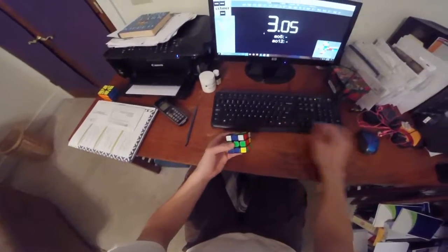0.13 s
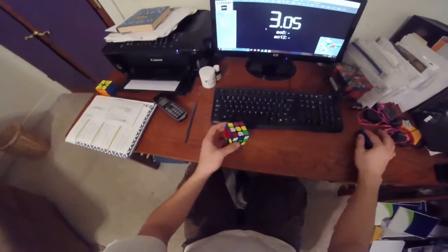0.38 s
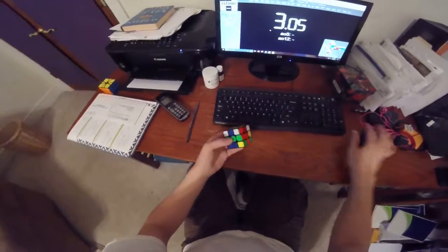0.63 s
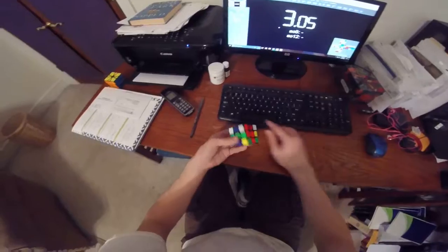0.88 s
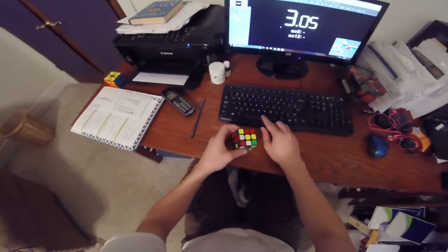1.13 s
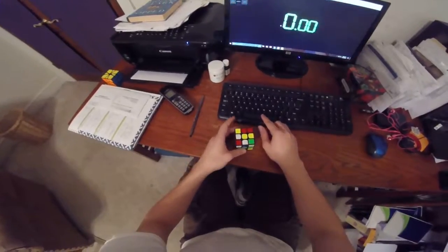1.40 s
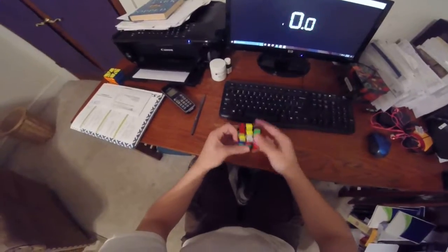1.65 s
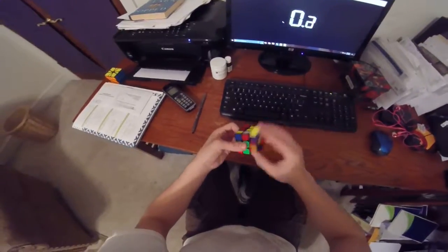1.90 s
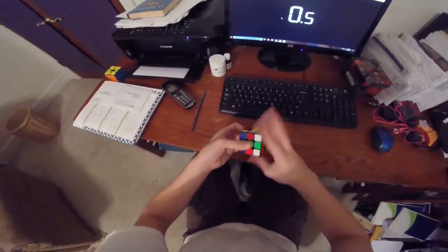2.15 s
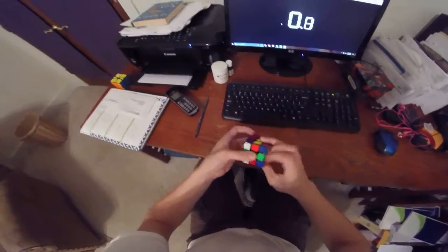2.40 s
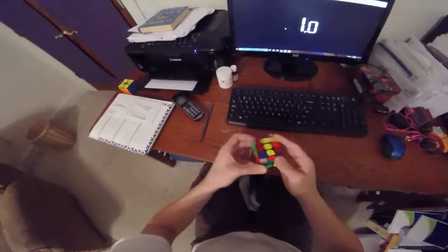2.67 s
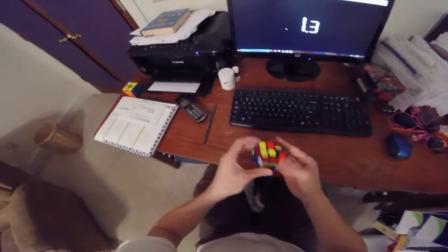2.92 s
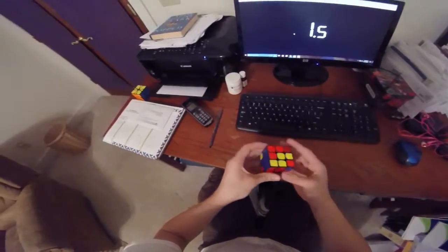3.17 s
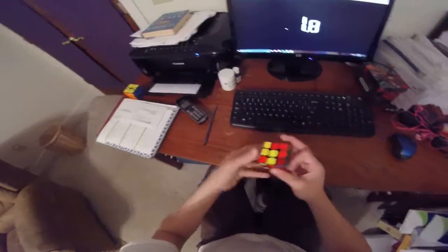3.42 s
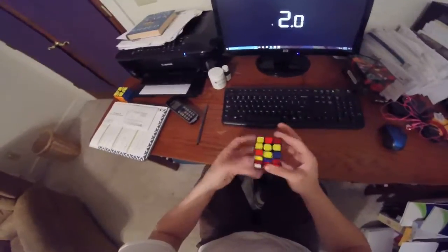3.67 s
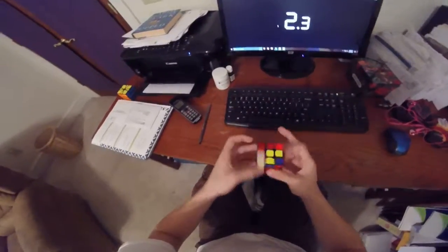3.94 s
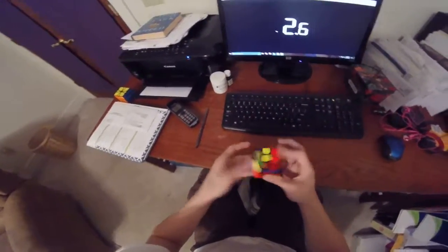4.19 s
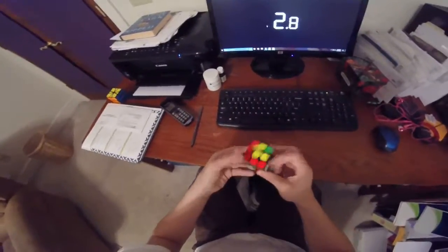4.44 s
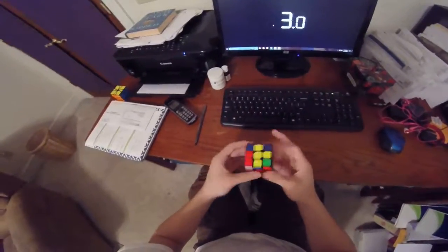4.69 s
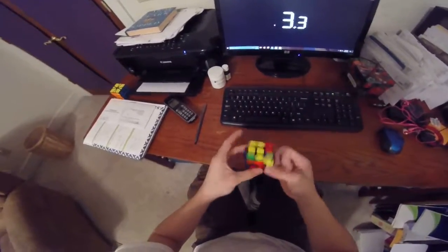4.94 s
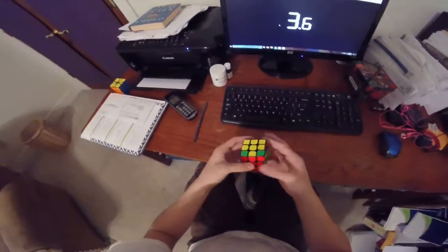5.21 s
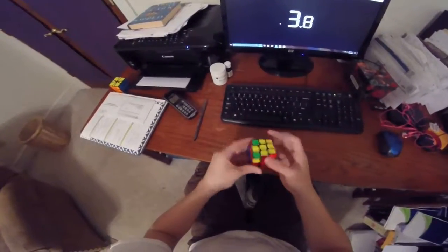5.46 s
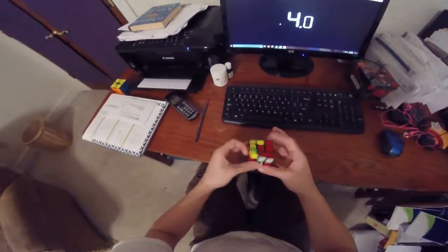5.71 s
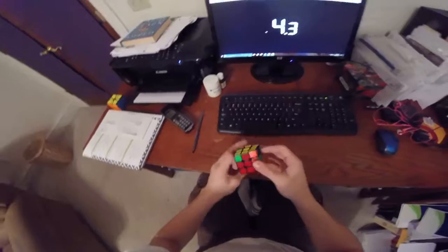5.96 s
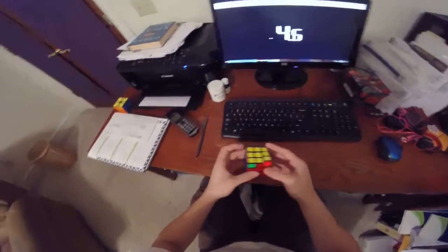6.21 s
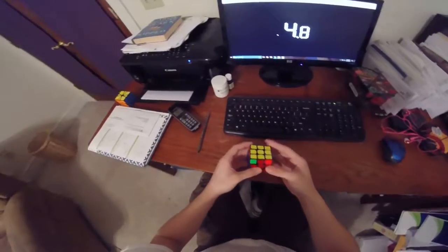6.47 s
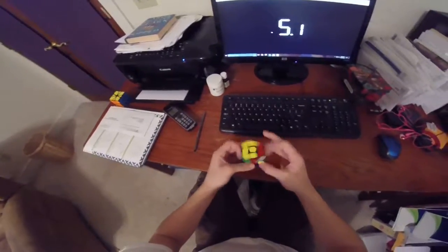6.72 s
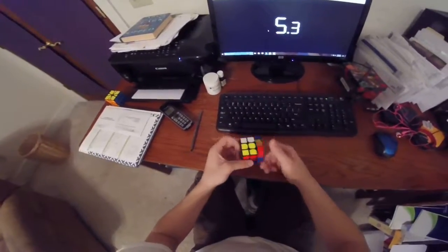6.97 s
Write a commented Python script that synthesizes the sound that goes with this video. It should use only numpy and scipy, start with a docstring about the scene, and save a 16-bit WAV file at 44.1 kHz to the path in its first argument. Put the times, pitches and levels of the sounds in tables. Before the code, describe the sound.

A person's hands work at a wooden desk: a tiny mouse tick, a firm key press with a small bounce and release, then rapid plastic cube turning. Dry, bright clicks and hollow clacks ride on rough sliding chatter, growing stronger midway, with short gaps while the hands regrip and a final quick burst. Close small microphone, short room reflections, low steady hiss.

```python
"""A quiet hiss, strongest in the bass, lies under everything in a small furnished room.
First a mouse button ticks, as short pushes ring its switch and its plastic body.
Then a wide keyboard key clacks and knocks on a wooden desk, as pushes ring the cap and the desk top.
Last a plastic puzzle cube is turned fast in two hands: layers slide as a stream of small rough contacts,
and pieces catch and snap as single noisy pushes that ring cavity, shell and thin edges."""
import sys
import numpy as np
from scipy import signal
from scipy.fft import rfft, irfft, next_fast_len
from scipy.io import wavfile

SR = 44100
rng = np.random.default_rng(int(sys.argv[2]) if len(sys.argv) > 2 else 0)


def put_to_file(sound):
    """Save the sound as 16-bit audio at rate SR, in the file named by the first command-line argument."""
    columns = np.atleast_2d(sound).T  # one column per channel
    safe = np.clip(columns, -1, 1)
    whole_steps = np.round(safe * 32767)
    wavfile.write(sys.argv[1], SR, whole_steps.astype(np.int16))


def convert_level_to_amplitude(level_db):
    """Map a level in decibels to its linear amplitude factor."""
    exponent = np.asarray(level_db, float) / 20
    return 10 ** exponent


N = 313110  # length in samples


def unit_rms(x):
    """Scales a sound to rms 1."""
    return x / np.sqrt(np.mean(x ** 2) + 1e-20)


def along(points, hz):
    """Reads a curve of (Hz, value) points on a log frequency axis."""
    point_hz, value = np.transpose(points)
    return np.interp(np.log(hz + 1), np.log(point_hz + 1), value)


def filtered(x, response):
    """Filters x by a complex response, given as a function of frequency in Hz."""
    size = next_fast_len(N + 8192)
    spectrum = rfft(x, size) * response(np.fft.rfftfreq(size, 1 / SR))
    return irfft(spectrum, size)[..., :N]


def resonances(modes, hz):
    """Causal response of a set of resonant modes, scaled so that white noise keeps its level."""
    response = 0
    for k, (center, width, db) in enumerate(modes):
        band = 1j * hz * width / (center * center - hz * hz + 1j * hz * width)
        response = response + (-1) ** k * convert_level_to_amplitude(db) * band  # alternating signs
    return response / np.sqrt(np.mean(np.abs(response) ** 2))


def rung(force, modes):
    """Drives the modes with a running force."""
    return filtered(force, lambda hz: resonances(modes, hz))


def placed(start_s, energy_db, push, modes, pitch=1):
    """Rings the modes with each row of push, at its pitch ratio and energy, and lands it at its time."""
    size = push.shape[1]
    hz = np.fft.rfftfreq(size, 1 / SR)
    ring = irfft(rfft(push) * resonances(modes, hz / pitch), size)
    ring = ring * convert_level_to_amplitude(energy_db)[:, None] / np.linalg.norm(ring, axis=1, keepdims=True)
    at = np.round(start_s * SR).astype(int)[:, None] + np.arange(size)
    return np.bincount(at.ravel(), ring.ravel(), N + SR)[:N]


def contacts(start_s, db, hold_ms, modes, rise_ms, fall_ms):
    """Short rough pushes: a quick rise, a hold while the faces chatter, a quick release.

    Row 0 is heard directly; row 1 is the same energy sent all round,
    where the chance colour of one push evens out."""
    pitch_spread = 0.024  # scatter of the log pitch from contact to contact
    rise_share = 0.21  # part of the contact time added to the rise
    t_ms = np.arange(2048) * 1000 / SR
    hold_ms = hold_ms[:, None]
    rise = np.clip(t_ms / (rise_ms + rise_share * hold_ms), 0, 1)
    release = np.exp(-np.clip(t_ms - hold_ms, 0, None) / fall_ms)
    shape = rise * release
    energy_db = db + 10 * np.log10(np.sum(shape ** 2, axis=1))
    pitch = np.exp(pitch_spread * rng.standard_normal((len(start_s), 1)))
    rough_push = shape * rng.standard_normal(shape.shape)
    click = np.broadcast_to(t_ms == 0, shape.shape)
    direct = placed(start_s, energy_db, rough_push, modes, pitch)
    spread = placed(start_s, energy_db, click, modes, pitch)
    return np.array([direct, spread])


# Tilt of the background hiss. Each row: frequency in Hz, relative density in dB per Hz.
HISS_SPECTRUM = [(15, -6.5), (25, 0.5), (120, -4.5), (300, -9), (700, -16), (2000, -23), (5000, -30.5),
                 (10000, -40.5), (15500, -43)]


def hiss():
    """Steady air and microphone noise, strongest in the bass."""
    noise = filtered(rng.standard_normal(N), lambda hz: convert_level_to_amplitude(along(HISS_SPECTRUM, hz)))
    return convert_level_to_amplitude(-53.5) * unit_rms(noise)


# Decay of the furnished room. Each row: frequency in Hz, nominal t60 in s, between the quick and slow falls.
ROOM_DECAY = [(150, 0.23), (500, 0.33), (1500, 0.16), (4000, 0.18), (10000, 0.17)]


def room(x):
    """Diffuse answer of the room, a quick fall with a weaker slow one under it.

    The hands move, so the noise tail is new every 0.2 s, with crossfades."""
    hop = SR // 5
    out = np.zeros(N + 3 * SR)
    padded = np.pad(x, (hop, 2 * hop))
    fade = np.sqrt(np.hanning(2 * hop + 1)[:-1])
    for start in range(0, N + hop, hop):
        hz, t, noise = signal.stft(rng.standard_normal(SR // 2), SR, nperseg=256)
        fall_db = -60 * t / along(ROOM_DECAY, hz)[:, None]
        quick_and_slow = convert_level_to_amplitude(1.32 * fall_db) + convert_level_to_amplitude(0.48 * fall_db - 12.5)
        tail = signal.istft(noise * quick_and_slow, SR, nperseg=256)[1]
        tail = tail / np.linalg.norm(tail)
        wet = signal.fftconvolve(padded[start:start + 2 * hop] * fade, tail)
        out[start:start + len(wet)] += wet
    return np.pad(out[hop:], (round(0.004 * SR), 0))[:N]  # the answer starts 4 ms late


# Mouse button down and up. Each row: start in seconds, tick in dB, body in dB, contact time in ms.
MOUSE_CLICKS = [(.538, -58, -47, 3.3), (.5425, -54.5, -51, 2.8), (.6253, -66, -50.5, 4.7),
                (.629, -60, -58, 10)]
# Ring of the small switch. Each row: frequency in Hz, width in Hz, relative level in dB.
SWITCH_MODES = [(5540, 500, -10), (6600, 320, -4), (8200, 690, -10.5)]
# Ring of the mouse's plastic body. Each row: frequency in Hz, width in Hz, relative level in dB.
MOUSE_BODY_MODES = [(685, 210, 0.18), (1880, 590, -1.7)]


def mouse():
    """A small switch ticks inside its plastic body, both rung by the same short contacts."""
    start_s, tick_db, body_db, hold_ms = np.transpose(MOUSE_CLICKS)
    tick = contacts(start_s, tick_db, hold_ms, SWITCH_MODES, rise_ms=0.25, fall_ms=3.1)
    body = contacts(start_s, body_db, hold_ms, MOUSE_BODY_MODES, rise_ms=0.4, fall_ms=1.3)
    return tick + body


# The wide key pressed, bouncing and let go.
# Each row: start in seconds, clack in dB, desk knock in dB, contact time in ms.
KEY_HITS = [(1.1348, -29, -28, 1), (1.208, -46, -45, 0.83), (1.23, -57, -40.5, 5.5),
            (1.2384, -54, -46, 1.2), (1.3385, -34.5, -35, 1.47), (1.352, -39, -39, 0.9),
            (1.6001, -40, -42.5, .7)]
# Ring of the key's cap. Each row: frequency in Hz, width in Hz, relative level in dB.
KEYCAP_MODES = [(1070, 510, 1), (1990, 190, 11), (2630, 370, 2), (3450, 480, 5.5), (5360, 1700, -2.5),
                (7560, 2400, -6.5), (10900, 2700, -32)]
# Ring of the wooden desk top. Each row: frequency in Hz, width in Hz, relative level in dB.
DESK_MODES = [(134, 22, -4.5), (200, 28, -12), (277, 44, -1.5), (337, 51, -2), (468, 38, -1),
              (632, 39, 3.5), (734, 135, -5)]


def key():
    """The key lands, bounces and springs back: the cap clacks and a smooth push knocks the desk top.

    Long pushes ring low."""
    start_s, clack_db, knock_db, contact_ms = np.transpose(KEY_HITS)
    clack = contacts(start_s, clack_db, contact_ms, KEYCAP_MODES, rise_ms=0.11, fall_ms=2.3)
    t_ms = np.arange(8192) * 1000 / SR
    push = np.sin(np.pi * np.clip(t_ms / contact_ms[:, None], 0, 1))
    energy_db = knock_db + 10 * np.log10(SR / 100)  # level as if spread over 10 ms
    knock = placed(start_s, energy_db, push, DESK_MODES)
    return clack + knock * convert_level_to_amplitude([[0], [-5]])  # the room gets less of the knock


# Layers rubbing as they turn. Each row: start in seconds, effort in dB, build time in ms.
RUB_TURNS = [(1.592, -43.5, 12), (1.632, -46.5, 13), (1.674, -46.5, 41), (1.769, -41, 13),
             (1.828, -44.5, 28), (1.962, -40.5, 26), (2.004, -39, 9.5), (2.077, -43, 44), (2.25, -43, 33),
             (2.29, -41.5, 14), (2.307, -34, 65), (2.469, -51, 15), (2.52, -45.5, 18), (2.559, -35.5, 4.8),
             (2.985, -45.5, 29), (3.023, -32, 16), (3.07, -38, 17), (3.095, -35, 15), (3.41, -39.5, 53),
             (3.535, -45.5, 14), (3.574, -29.5, 36), (3.645, -36.5, 28), (3.785, -44.5, 9.6),
             (3.815, -34.5, 17.4), (3.847, -30.5, 67), (3.973, -29, 17.6), (4.066, -42, 12),
             (4.094, -34, 30), (4.21, -45, 12), (4.241, -31, 16), (4.325, -52, 27), (4.437, -48.5, 13),
             (4.467, -31.5, 18), (4.538, -38.5, 26), (4.635, -37, 43), (4.863, -46, 11), (4.878, -38, 5.4),
             (4.944, -29, 16), (4.982, -30, 38), (5.388, -52, 14), (5.422, -49, 15), (5.539, -39, 17),
             (5.625, -33, 43), (5.698, -29, 44), (5.771, -27.5, 47.5), (5.838, -30, 25), (5.89, -37, 8.5),
             (5.926, -30, 21), (6.566, -49, 13), (6.585, -36, 17.7), (6.673, -34, 16), (6.712, -36, 34),
             (6.765, -35.5, 29), (6.825, -37, 36), (6.888, -40, 34), (6.954, -37, 13), (7.0, -38.5, 13),
             (7.03, -43, 17), (7.07, -52, 9)]
# How closed the palms are. Each row: time in seconds, change of the palm hollow's level in dB.
CUPPED_PALMS = [(1.6, 2), (2.1, -0.5), (2.4, -2.5), (3.0, 1.5), (3.6, -2), (4.0, -0.5), (4.5, 1), (5.0, 4),
                (5.5, 0), (5.9, 1), (6.7, -1), (6.96, 7), (7.05, 0)]
# Hollow of the cupped palms. Each row: frequency in Hz, width in Hz, relative level in dB.
PALM_MODES = [(606, 173, 4.5), (730, 346, -3.5)]
# Ring of the cube's shell. Each row: frequency in Hz, width in Hz, relative level in dB.
SHELL_MODES = [(1060, 266, -6), (1437, 188, 2), (2030, 490, -0.5)]
# Ring of the cube's inner cavity. Each row: frequency in Hz, width in Hz, relative level in dB.
CAVITY_MODES = [(3255, 506, 12.97), (3520, 281, 18.4), (4480, 750, 2)]
# Ring of the cube's thin edges. Each row: frequency in Hz, width in Hz, relative level in dB.
EDGE_MODES = [(5190, 410, -4), (6650, 610, -2), (8110, 490, -4), (10100, 1840, -12.5), (11100, 1600, -16.5)]


def rubbing_effort():
    """Every turn climbs, holds and lets go alike; the palm hollow swings less than the effort."""
    climb_db, hold_ms, ease_db_per_ms = 13, 17.3, 1.9
    firm_turn_db, firm_palm_db, palm_follows = -33, -52, 0.44
    since_ms = np.arange(SR // 4) * 1000 / SR
    power = np.zeros((2, N + SR))
    for start_s, db, build_ms in RUB_TURNS:
        cupped_db = np.interp(start_s, *np.transpose(CUPPED_PALMS))
        palm_db = firm_palm_db + palm_follows * (db - firm_turn_db) + cupped_db
        building_db = climb_db * np.minimum(since_ms / build_ms - 1, 0)
        easing_db = ease_db_per_ms * np.maximum(since_ms - build_ms - hold_ms, 0)
        course_db = building_db - easing_db
        at = round(start_s * SR)
        power[:, at:at + len(since_ms)] += convert_level_to_amplitude(2 * (np.array([[db], [palm_db]]) + course_db))
    return np.sqrt(power[:, :N])


def slide():
    """Layers rub and loose pieces rattle: many small uneven contacts ring the cube and the palm hollow."""
    effort, grip = rubbing_effort()
    tick_db = np.minimum(7.0 * rng.exponential(size=N), 8)  # capped, as the big ones are the snaps
    ticks = (rng.random(N) < 400 / SR) * convert_level_to_amplitude(tick_db)  # about 400 per second
    tick_fall = np.exp(-np.arange(300) / (0.00085 * SR))  # 0.85 ms decay
    chatter = 0.39 + unit_rms(signal.fftconvolve(ticks, tick_fall)[:N])

    def rough():
        return unit_rms(chatter * rng.standard_normal(N))

    cavity = convert_level_to_amplitude(-6.0) * rung(effort * rough(), CAVITY_MODES)
    edges = convert_level_to_amplitude(-12.5) * rung(effort * rough(), EDGE_MODES)
    shell = convert_level_to_amplitude(-7.5) * rung(effort * rough(), SHELL_MODES)
    palms = rung(grip * rough(), PALM_MODES)
    return cavity + edges + shell + palms


# Cube snaps. Each row: start in seconds, cavity in dB, shell in dB relative to cavity, contact time in ms.
CUBE_SNAPS = [(1.676, -37, 0, 1.7), (1.6934, -35, -2.5, 1.6), (1.7231, -42, 2, 4), (1.746, -34, -3.5, 5.3),
              (1.7913, -29, -9.5, 1.6), (1.8554, -45, 3.5, 8.3), (1.8756, -40, 3, 3.3),
              (1.966, -43.5, -5, 6.4), (1.9878, -33, -5, 3.4), (2.0229, -31.5, -3, 4.5),
              (2.112, -36, 2, 3.2), (2.132, -34, -3.5, 1), (2.2815, -33, -4.5, 5), (2.3288, -31, -6, 2.9),
              (2.3508, -29.5, -8, 1.1), (2.3768, -25.5, -0.2, 4.3), (2.4002, -28.5, -17, 3),
              (2.488, -38.5, -3.5, 2.7), (2.5662, -30, -4.5, 8.2), (2.5852, -30.5, -10, 1.5),
              (2.6253, -40.5, -7, 2), (2.7177, -41.5, -16, 2.9), (2.8212, -51, 3.5, 1.7),
              (2.891, -58, 2, 2.3), (3.021, -28.5, -6.5, 3.1), (3.0389, -28.5, -2.5, 1.3),
              (3.0495, -25.5, -5.5, 5.6), (3.0586, -30, 3, 0.99), (3.085, -26, -8, 2.2),
              (3.1212, -32, 2.5, 1.7), (3.1342, -36, -20, 3.1), (3.1956, -45, -9, 1.6),
              (3.4452, -35.5, 1.5, 2.2), (3.4559, -33, -17, 1.7), (3.5649, -41.5, 1, 3.7),
              (3.5815, -30.5, 2.5, 2), (3.6172, -20, -6, 2.8), (3.6722, -26.5, 1.5, 1.37),
              (3.685, -29.5, -6, 4.2), (3.843, -27.5, -6.5, 2.2), (3.861, -34, -5, 3.5),
              (3.879, -26.5, -9, 2.7), (3.899, -19, -1.5, 0.91), (3.9221, -23, -2.5, 2.3),
              (3.9598, -31, -6, 3.2), (3.9987, -33.5, -2.5, 5.4), (4.0766, -28.5, -5, 0.83),
              (4.0943, -35.5, 3, 3.2), (4.1037, -32, -2.5, 8), (4.121, -26, -9, 3), (4.1352, -23, -7, 5.4),
              (4.1792, -35.5, -3, 3.6), (4.2404, -28.5, -10, 2), (4.2624, -31.5, -4.5, 15),
              (4.2809, -26.5, -6, 5), (4.3393, -34.5, -30, 1.3), (4.3592, -36.5, -12, .91),
              (4.4641, -34.5, -4, 3.7), (4.481, -20, -11.5, 2), (4.5105, -20, -3, .75),
              (4.5787, -38.5, 3, 2.3), (4.637, -35.5, -4.5, 3.1), (4.6622, -35.5, -0.5, 5.6),
              (4.6851, -21.5, -2, 0.79), (4.8891, -27, 0, 1.2), (4.907, -40.5, 6, 2.1),
              (4.9411, -28, 0, 2.8), (4.9515, -24, -2.5, 2.9), (4.972, -22.5, -8, 3.5),
              (4.9841, -23.5, -5.5, 3.1), (5.033, -19.5, -7, 5.1), (5.4035, -41, 3, 1.5),
              (5.4424, -41, -6, 4.9), (5.556, -41, 4, 1.1), (5.5646, -39.5, 4, 1.5), (5.5825, -31, -3, .98),
              (5.6097, -24.5, -2.5, 0.47), (5.6595, -32, -7, 4.2), (5.7366, -29, -5, 9.3),
              (5.7694, -27, -20, 2.7), (5.8, -24, -11, 3.6), (5.821, -33.5, -12, 4.6),
              (5.8323, -34, 3, 1.6), (5.8509, -28, -1, 4.8), (5.8748, -18.5, -15, 2),
              (5.913, -29, -10, 2.5), (5.9302, -32, 8, 0.96), (5.958, -18, -13.5, 2.9),
              (5.9715, -26, 3, 0.66), (6.1847, -45.5, -3, 1.1), (6.6041, -40, -1, 7.1),
              (6.6738, -35, 0, 3.1), (6.6923, -21.5, -27, 1.9), (6.7026, -33, -9, 1.7),
              (6.7412, -35, -13, 2.6), (6.7777, -32, -2.5, 2.8), (6.7934, -29, -8, 4.8),
              (6.8111, -21.5, -7, 0.7), (6.86, -21, -3, 2.2), (6.8669, -34, 4.5, 3.2),
              (6.9105, -35, -7, 1.6), (6.943, -29, -3.5, 2.7), (6.9724, -29.5, -3.5, 7.3),
              (6.9872, -29, -7, 5.2), (7.052, -36, -1, 2.1)]


def snaps():
    """Pieces catch and snap home; a blow near the outside rings shell and edges more, the cavity less."""
    start_s, cavity_db, shell_db, hold_ms = np.transpose(CUBE_SNAPS)
    edge_db = cavity_db - 4.5 + 0.37 * shell_db  # edges follow a share of the shell's dB
    cavity = contacts(start_s, cavity_db, hold_ms, CAVITY_MODES, rise_ms=0.36, fall_ms=1.0)
    shell = contacts(start_s, cavity_db + shell_db, hold_ms, SHELL_MODES, rise_ms=0.75, fall_ms=0.48)
    edges = contacts(start_s, edge_db, hold_ms, EDGE_MODES, rise_ms=1.0, fall_ms=0.94)
    return cavity + shell + edges * convert_level_to_amplitude([[-1.5], [1.5]])  # edges: less direct, more to the room


def scene():
    """Mixes hands and desk, treble shaded by the fingers on the direct path, with room and hiss."""
    direct, spread = snaps() + slide() + key() + mouse()
    shaded = filtered(direct, lambda hz: 1 / (1 + 1j * hz / 9000))
    mix = shaded + convert_level_to_amplitude(-3) * room(spread) + hiss()
    return mix[None]


# Treble loss of the microphone. Each row: frequency in Hz, gain in dB.
MICROPHONE_RESPONSE = [(9000, 0), (12000, -2.5), (15200, -6.5), (15600, -30), (16200, -70)]


def band_limit(x):
    """A steep low-pass at the top of the band."""
    return signal.sosfilt(signal.butter(12, 15700, fs=SR, output="sos"), x)


def record(dry):
    """A small camera microphone loses the top treble."""
    heard = filtered(dry, lambda hz: convert_level_to_amplitude(along(MICROPHONE_RESPONSE, hz)))
    return band_limit(heard)


dry = scene()
out = record(dry)
put_to_file(out)
```